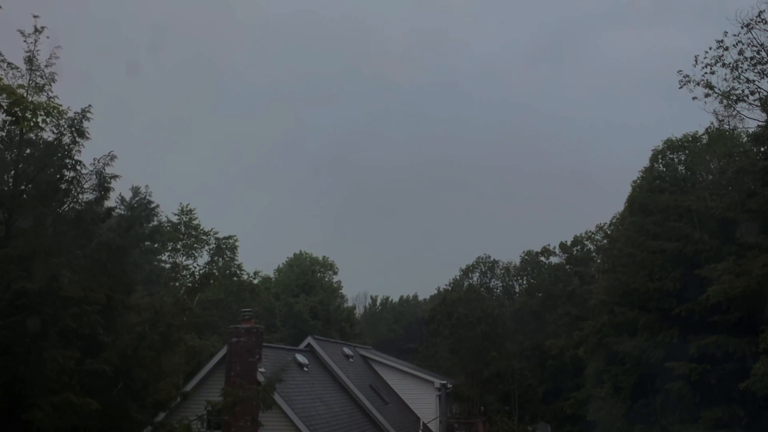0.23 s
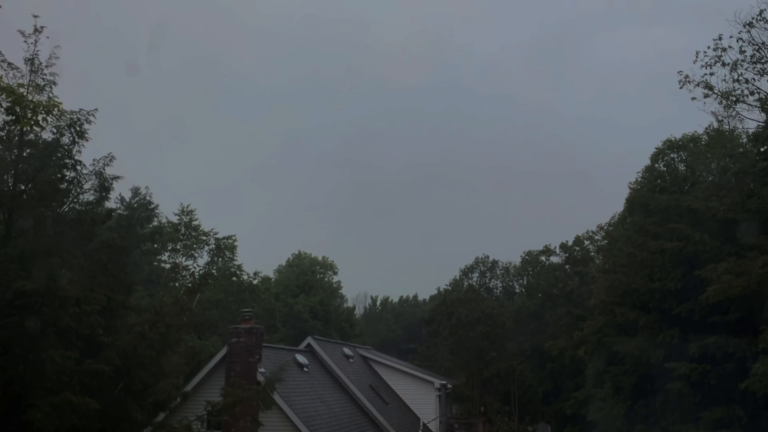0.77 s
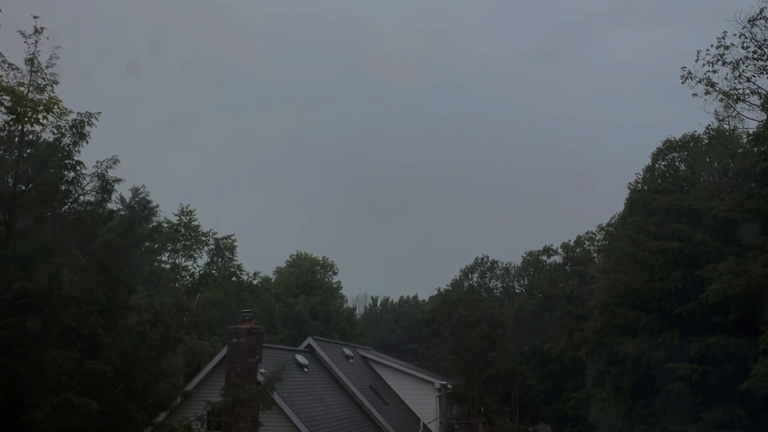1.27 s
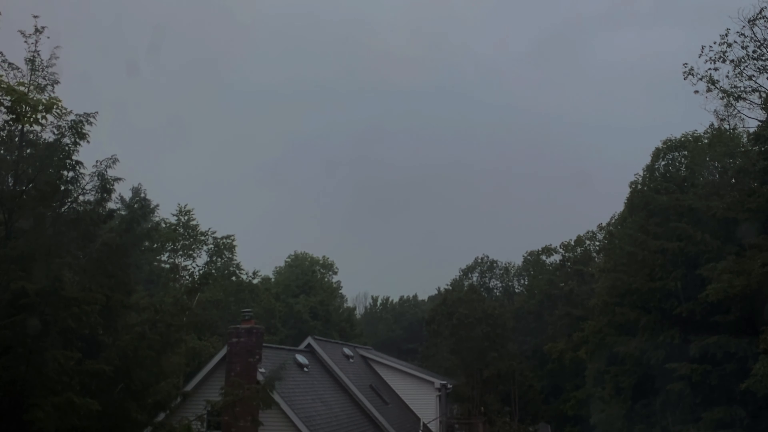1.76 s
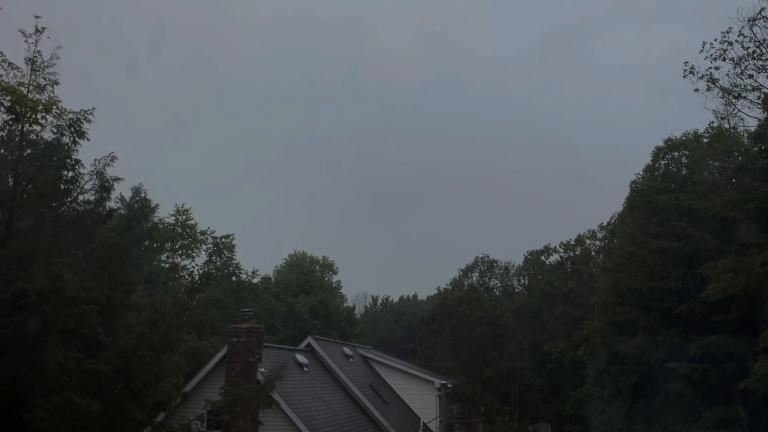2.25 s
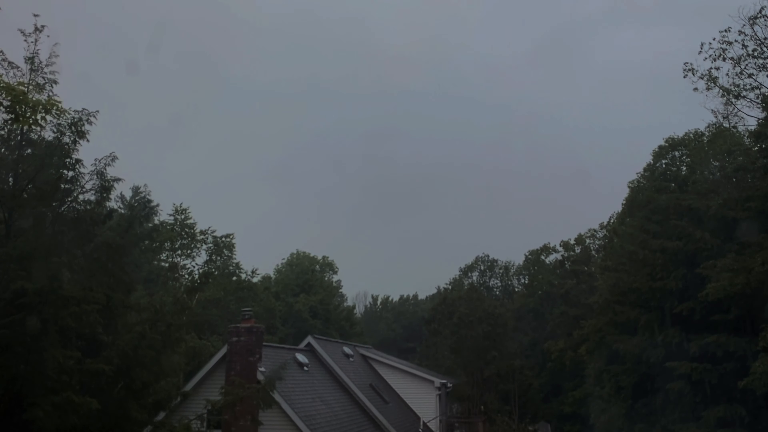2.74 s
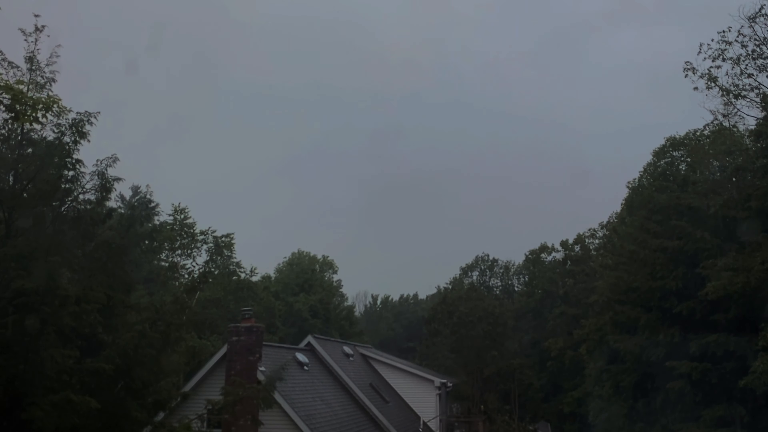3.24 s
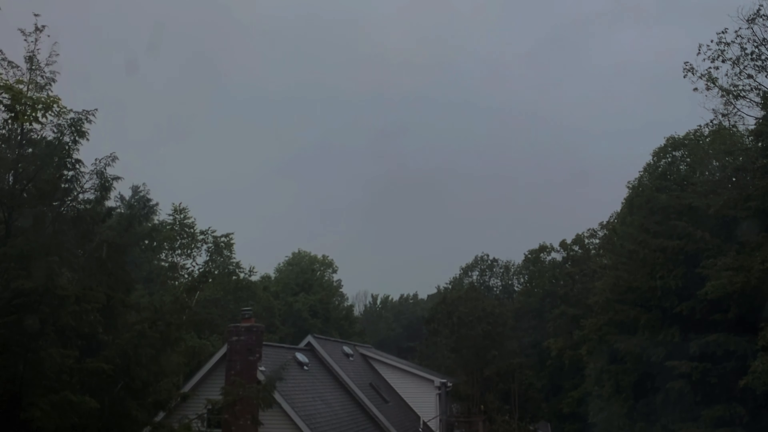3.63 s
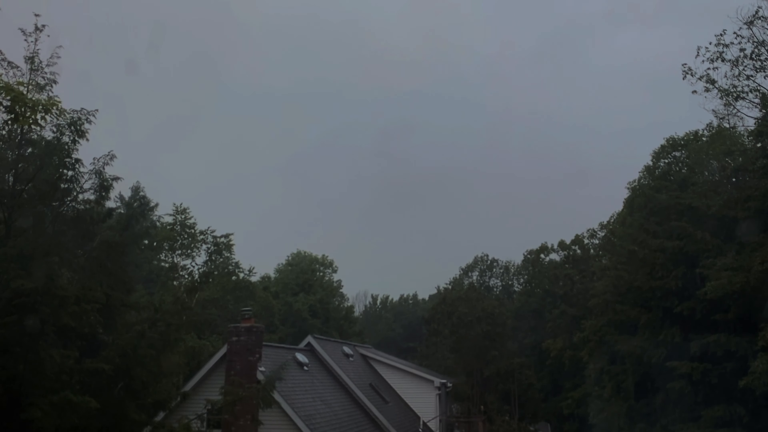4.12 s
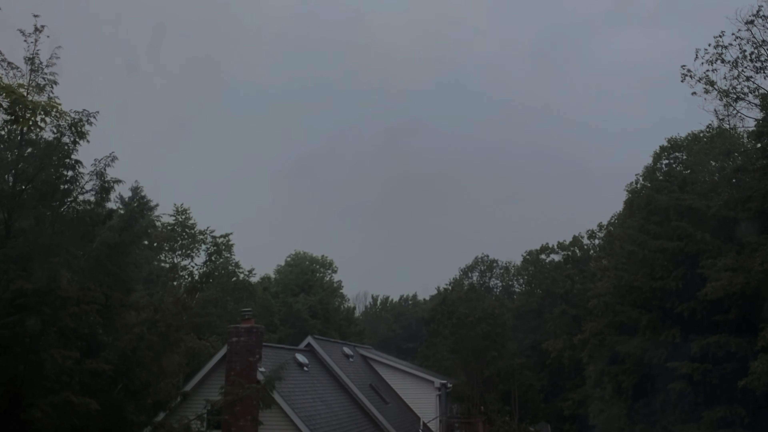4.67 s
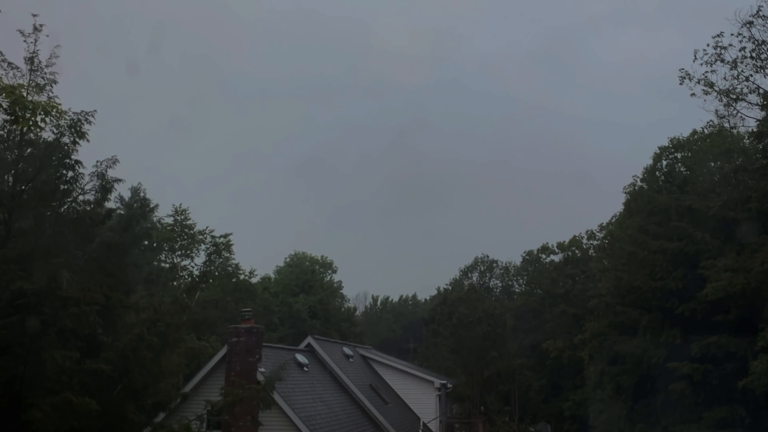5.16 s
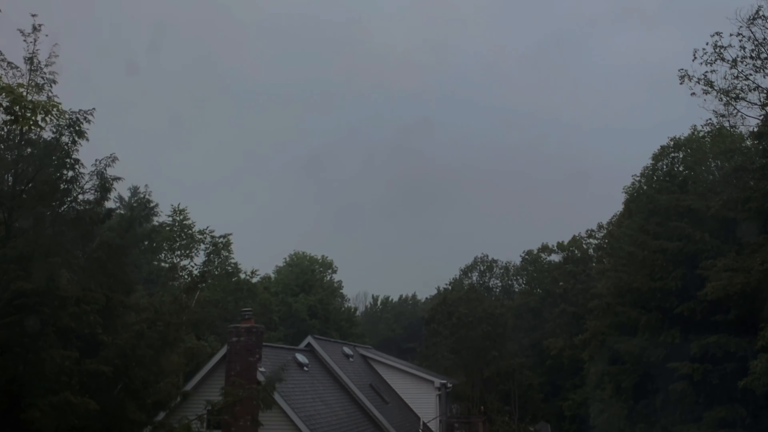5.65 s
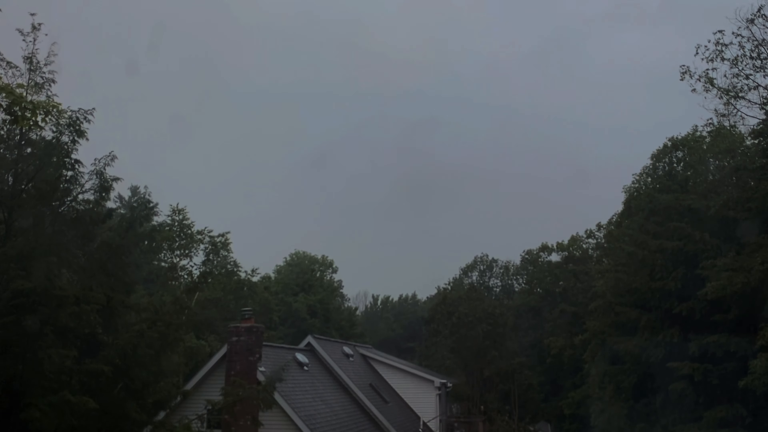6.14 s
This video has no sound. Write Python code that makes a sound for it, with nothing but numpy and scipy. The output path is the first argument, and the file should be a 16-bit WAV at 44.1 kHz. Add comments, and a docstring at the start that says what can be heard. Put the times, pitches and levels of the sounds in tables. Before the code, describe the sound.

Stereo, from a room with an open window, trees and light rain hissing softly outside throughout. The first half second is nearly quiet: low rumble, faint crackle and a small near click at about 0.2. Around 0.5 thunder breaks close by with deep thuds, quickly growing into a violent tearing crackle, loudest from 0.75 to 0.95, with hard cracks and chest-heavy thumps. It drops away by 1.2, leaving rumble with separate claps near 1.3 and 1.5, a stronger knock at 1.9 to 2.0, and weaker ones at 2.2, 2.3 and 2.7. At 3.4 a second peal swells, more boom and growl than crackle, bumping heavily until about 4.2, then rolling off unevenly. A shorter boom comes at 5.2, a distinct close click at 5.5, then dull distant grumbling until the end at 6.4. Room resonances make the thunder slightly hollow, with briefly pitched growls; a few tiny ticks are nearby.

```python
"""Close thunder heard through an open window

A cracking first peal, single claps, then a second peal that rolls away over a distant rumble.
Shocks from the crooked lightning channel arrive in swarms, made as random impulses filtered into boom,
thud, growl and crackle; claps, cracks, thumps and briefly pitched surges stand out, and room modes colour all.
Trees and light rain hiss outside as filtered noise; a few near ticks and clicks are short noise bursts.
"""
import sys
import numpy as np
from scipy import signal
from scipy.fft import rfft, irfft, next_fast_len
from scipy.io import wavfile
from scipy.ndimage import uniform_filter1d, minimum_filter1d, map_coordinates

SR = 44100
rng = np.random.default_rng(int(sys.argv[2]) if len(sys.argv) > 2 else 0)


def to_wav(s):
    """Save 16-bit WAV."""
    ch = np.atleast_2d(s).T  # columns
    pcm = np.round(np.clip(ch, -1, 1) * 32767)  # PCM
    wavfile.write(sys.argv[1], SR, pcm.astype(np.int16))


N = 282057

# claps, where a stretch of the channel arrives all at once and a short swarm follows in its wake:
# start_s, length_s, strength_db, crackle_db (against strength), depth_db (wake: more boom, less growl)
CLAPS = [(0.261, 0.043, -55, -1, 7), (0.511, 0.031, -31.5, -28, 3.5), (0.681, 0.028, -23.5, -23.5, -1.5),
         (0.743, 0.042, -21, -26, -2.5), (0.851, 0.054, -24, -17.5, -7.5), (1.155, 0.036, -35, -13, 2.5),
         (1.302, 0.034, -28.5, -19, -1.5), (1.47, 0.033, -31, -17.5, 2), (1.906, 0.026, -26.5, -17.5, 3),
         (2.2, 0.032, -34, -19, 1), (2.683, 0.053, -32.5, -15, 2.5), (2.986, 0.027, -43.5, -17, -5.5),
         (3.403, 0.044, -30, -26, 5), (3.554, 0.04, -34, -18.5, -4.5)]
# spectral shape of claps and thumps: frequency_hz, density_db (per Hz)
CLAP_SPECTRUM = [(20, -41), (45, -11), (80, -9), (170, 6.5), (310, 1), (420, -5), (520, -22.5), (1000, -46),
                 (4000, -100)]
# spectral shape of the shortest shocks: frequency_hz, density_db (per Hz)
CRACKLE_SPECTRUM = [(250, -47), (430, -6), (560, 5.5), (700, 3.5), (810, 1), (1020, -0.5), (1300, -0.5),
                    (1550, -8), (2100, -18), (2600, -20.5), (4000, -31), (6500, -58.5), (12000, -76.5)]


def amp(db):
    """Decibels to an amplitude ratio."""
    return 10 ** (np.asarray(db) / 20)


def unit(x):
    """Scale to a root-mean-square of 1."""
    return x / np.sqrt(np.mean(x ** 2) + 1e-20)


def along(points, hz):
    """Interpolate (frequency, value) points on a logarithmic frequency axis."""
    f, v = np.transpose(points)
    return np.interp(np.log(hz + 1), np.log(f + 1), v)


def curves(rows):
    """Interpolate each column after the time to one value per sample."""
    s, *cols = np.transpose(rows)
    return [np.interp(np.arange(N) / SR, s, c) for c in cols]


def wobble(rate):
    """Slow fluctuation: a smooth curve through random knots, rate of them a second."""
    knots = rng.standard_normal(int(N * rate / SR) + 4)
    return map_coordinates(knots, [np.arange(N) * rate / SR])


def filtered(x, response):
    """Linear filtering: multiply the spectrum by a response of frequency."""
    m = next_fast_len(N + SR // 2)
    return irfft(rfft(x, m) * response(np.fft.rfftfreq(m, 1 / SR)), m)[..., :N]


def causal(x, shape, size=32768):
    """Minimum-phase filtering: a dB shape of frequency fixes a causal response, scaled to energy 1."""
    cepstrum = irfft(np.log(amp(shape(np.fft.rfftfreq(size, 1 / SR)))))
    # folding the cepstrum onto positive times makes the phase minimal
    response = irfft(np.exp(rfft(2 * cepstrum[:size // 2], size)))
    response = response / np.linalg.norm(response)
    return signal.fftconvolve(x, response[None], axes=1)[:, :N]


def ring(x, spectrum):
    """Impulse response: each shock in x becomes a pulse with the given spectral shape."""
    return causal(x, lambda hz: along(spectrum, hz))


def shocks(rate, scatter_db):
    """Poisson-like arrivals: mid and side trains of random-sign impulses, rate a second, uneven in size."""
    arrive = rng.random((2, N)) < rate / SR
    sign = np.sign(rng.standard_normal((2, N)))
    size = amp(scatter_db * rng.standard_normal((2, N)))
    return unit(arrive * sign * size)


def even(x, seconds):
    """Envelope normalization: take out swells slower than the given time and keep the fast grain."""
    window = max(int(seconds * SR), 2)
    power = uniform_filter1d(uniform_filter1d(x ** 2, window), window)
    return x / np.sqrt(np.abs(power) + 1e-9)


def swell(start, hold, fade):
    """Energy envelope in dB of one swarm: arrivals build up, hold, decay exponentially and run out."""
    rise_s, rise_share = 0.011, 0.26  # rise time: this minimum plus a share of the hold
    range_db = 18.5  # a swarm that has faded by this much has run out of channel
    end_db_per_s = 151  # extra fade from then on
    age = np.arange(N) / SR - start
    rise = np.clip(age / (rise_s + rise_share * hold), 1e-6, 1)
    fading = np.maximum(age - rise_s - hold, 0)
    spent = np.maximum(fading - range_db / fade, 0)
    silence_db = 100 * (age < 0)
    return 10 * np.log10(rise) - silence_db - fade * fading - end_db_per_s * spent


def swarms():
    """Incoherent addition: powers of rumble, peals and clap wakes sum to boom, thud, growl, crackle dB."""
    # peals, each a branch of the channel heard from its near end to its far end:
    # start_s, hold_s, fade_db_per_s, strength_db, then against strength: boom_db, growl_db, crackle_db
    peals = [(0, 0.0034, 245, -44, -3, -2, 2.5), (0.24, 0.027, 221, -51.5, 7, 13, 5),
             (0.346, 0.26, 92, -49, 6.5, -2, -1.5), (0.458, 0.026, 101, -57.5, -9.5, -5, 11.5),
             (0.53, 0.082, 98, -21.5, -1.5, -2.5, -21), (.64, 0.08, 102, -28.5, -3.5, -5.5, -12.5),
             (0.745, 0.17, 150, -18, -3.5, -2, -16.5), (0.811, 0.087, 128.5, -32, 0, -3.5, -9),
             (0.968, 0.036, 169.5, -25, -1, 3.5, -13.5), (1.08, 0.12, 111, -41.5, 2, 2, -9.5),
             (1.55, .06, 88, -42.5, 1, -2, -6.5), (1.667, 0.09, 104, -41, 3.5, 5.5, -11.5),
             (1.869, .06, 75.5, -48.5, -4.5, -4, 2), (1.915, 0.026, 200, -29, -1, -0.5, -15.5),
             (2.005, 0.039, 87.5, -45.5, -2.5, -0.5, -5), (2.284, 0.066, 174, -32, -3.5, -1, -22),
             (2.418, 0.013, 252, -40.5, 8.5, 3, -21), (2.717, 0.016, 264.5, -34, 0, -5.5, -23),
             (2.778, 0.024, 98, -52.5, -9, 4.5, -16), (2.973, 0.041, 90.5, -41.5, 1.5, 11.5, -19.5),
             (3.075, 0.039, 129, -37.5, 2.5, -1, -15), (3.416, 0.11, 57.5, -22, -6, -5, -24),
             (3.534, 0.2, 16.5, -24, -1.5, -1.5, -19), (3.747, 0.38, 29, -32.5, -7, 1.5, -11),
             (4.117, 0.15, 148, -36, -5.5, -0.5, -9), (4.4, 0.18, 78.5, -32, -10.5, -2.5, -15.5),
             (4.869, 0.078, 185, -44.5, -3, 7, -2), (5.018, 0.046, 120, -48, 3, -5.5, -1.5),
             (5.049, 0.2, 100.5, -33, 4, -2.5, -10.5), (5.102, .06, 90.5, -31.5, -0.5, -6, -18.5),
             (5.221, 0.074, 175, -27.5, 2, -4.5, -19), (5.456, 0.036, 118, -40.5, 5.5, 5.5, -5),
             (5.567, 0.041, 66, -42, 5.5, 2.5, -4.5), (5.641, 0.034, 94, -36, -7.5, -2, -13),
             (5.719, 0.043, 95, -48.5, -3, 0, -10), (6.049, .05, 116, -52.5, 8.5, -4, -7),
             (6.217, .05, 82, -42, -2.5, 0, -9), (6.314, .08, 60, -37.5, -16, 1, -15.5)]
    # the distant rumble under it all: time_s, level_db
    rumble = [(0, -48), (.15, -50), (.5, -56), (1.1, -42), (1.43, -43.5), (1.6, -43), (1.86, -43),
              (2.3, -44.5), (2.62, -45.5), (2.85, -44.5), (3.15, -42.5), (3.32, -45), (4.6, -41),
              (4.84, -44), (5.02, -46), (5.75, -44), (6.02, -46), (6.4, -47)]
    # the rumble's make-up: boom_db, thud_db, growl_db, crackle_db
    rumble_mix = (1, 3, 1, -8)
    wake_db, wake_s, wake_db_per_s = -4.5, 0.028, 133.5  # level against the clap, hold, fade
    shapes, mixes = [curves(rumble)[0]], [rumble_mix]
    for s, hold, fade, db, boom_db, growl_db, crackle_db in peals:
        shapes.append(swell(s, hold, fade))
        mixes.append(db + np.array([boom_db, 0, growl_db, crackle_db]))
    for s, _, db, crackle_db, depth_db in CLAPS:
        shapes.append(swell(s, wake_s, wake_db_per_s))
        mixes.append(db + wake_db + np.array([depth_db, 0, -depth_db, crackle_db]))
    power = amp(mixes).T ** 2 @ amp(shapes) ** 2
    return 10 * np.log10(power)


def roll(boom_db, thud_db, growl_db):
    """Superposed shock arrivals: swarms of long, medium and shorter pulses make boom, thud and growl."""
    # spectral shapes, longest shocks first: frequency_hz, density_db (per Hz)
    boom_spectrum = [(15, -45), (28, -24), (42, -5.5), (58, -5.5), (72, -2.5), (125, 3.5), (155, -9.5),
                     (230, -62), (500, -100)]
    thud_spectrum = [(60, -45), (110, -15.5), (140, -1), (175, -1.5), (230, -1.5), (265, -8), (340, -24.5),
                     (700, -80)]
    growl_spectrum = [(130, -43.5), (230, -16), (275, -3), (315, 0), (360, -6), (440, -11), (510, -23),
                      (700, -23.5), (1500, -73.5), (4000, -110)]
    boom = even(ring(shocks(rate=370, scatter_db=2.5), boom_spectrum), seconds=0.065)
    thud = even(ring(shocks(rate=300, scatter_db=4.0), thud_spectrum), seconds=0.042)
    growl = even(ring(shocks(rate=300, scatter_db=4.5), growl_spectrum), seconds=0.031)
    return amp(boom_db - 0.5) * boom + amp(thud_db - 5.0) * thud + amp(growl_db - 6.0) * growl


def crackle(level_db):
    """Air absorption over dense arrivals: the shortest shocks, from small kinks, merge into tearing."""
    # what a long path does to the crackle: frequency_hz, gain_db
    far_air = [(400, 7), (750, 4), (1100, -2), (2000, -11), (4000, -28)]
    near = ring(shocks(rate=1200, scatter_db=1.5), CRACKLE_SPECTRUM)
    far = filtered(near, lambda hz: amp(along(far_air, hz)))
    # the last shocks have come farthest, and the air has taken their treble
    dullness = np.interp(np.arange(N) / SR, [4.3, 5.3], [0, .65])
    grain = even((1 - dullness) * near + dullness * far, seconds=0.077)
    clumps_db = 1.3 * wobble(60)
    return amp(level_db - 3.5 + clumps_db) * grain


def claps():
    """Near-simultaneous arrival: each clap is a tight volley of shocks with a sudden front."""
    low, high = np.zeros((2, 2, N))
    swarm = shocks(rate=900, scatter_db=2)
    for s, length, db, crackle_db, _ in CLAPS:
        start, count = round(s * SR), round(length * SR)
        volley = unit(swarm[:, start:start + count] * np.linspace(1, .5, count))
        low[:, start:start + count] += amp(db) * volley
        high[:, start:start + count] += amp(db + crackle_db) * volley
    return ring(low, CLAP_SPECTRUM) + ring(high, CRACKLE_SPECTRUM)


def lone_shocks(events, spectrum):
    """Early reflection: each steep shock is followed by quick repeats off the ground and house walls."""
    echo_db, echo_s = -9.5, 0.0056  # typical level of a repeat, latest delay
    pair = np.zeros((2, N))
    for s, db in events:
        start = round(s * SR)
        pair[0, start] += amp(db)
        for channel in pair:
            delays = (rng.uniform(.1, 1, size=4) * echo_s * SR).astype(int)
            channel[start + delays] += amp(db + echo_db) * rng.standard_normal(size=4)
    return ring(pair, spectrum)


def surges():
    """Periodicity pitch: runs of almost evenly spaced shocks, drawn as unsteady sines in the mid alone."""
    # surges: start_s, length_s, mean_rate_hz (shocks per second), strength_db
    runs = [(0.681, 0.034, 320, -27), (0.693, 0.068, 85, -23), (0.824, 0.072, 80, -25.5),
            (0.852, 0.1, 415, -30.5), (0.88, 0.066, 220, -25), (0.956, 0.066, 422.9, -35.5),
            (1.309, 0.079, 313.4, -36.5), (1.476, 0.031, 316, -34), (1.482, 0.037, 205, -34.5),
            (2.177, 0.067, 319, -37.5), (3.09, 0.22, 227, -46.5), (3.479, 0.069, 81.5, -22),
            (3.555, 0.11, 181.3, -24.5), (3.649, .045, 318, -27.5), (3.829, 0.051, 318, -25.5),
            (4.521, .14, 232, -43.5), (5.234, 0.092, 101.1, -31.5), (5.281, 0.055, 210.6, -32),
            (5.463, .05, 315, -42), (6.321, .07, 230.5, -44.5)]
    jitter, rough_db = 0.027, -1.5  # unevenness of the spacing (share) and of the size
    t = np.arange(N) / SR
    pace = np.cumsum(1 + jitter * wobble(90)) / SR  # unevenly running time in s
    size = amp(rough_db * wobble(70))
    pair = np.zeros((2, N))
    for s, length, hz, db in runs:
        arch = np.sqrt(np.abs(np.sin(np.pi * np.clip((t - s) / length, 0, 1))))
        tone = np.sqrt(2) * np.sin(2 * np.pi * (hz * pace + rng.random()))
        pair[0] += amp(db) * arch * size * tone
    return pair


def room(x):
    """Modal resonance: standing waves colour the thunder and ring on, driven differently by direction."""
    # the room's modes, the narrow ones ringing longest:
    # centre_hz, width_hz, first_lift_db, second_lift_db (from the first and the second direction)
    modes = [(73, 27, 2.5, 7), (169.5, 15, 4, 10.5), (213.4, 14, 7.5, 8.5), (231.15, 10, 13, 7),
             (243, 18, -1, -3.5), (274.4, 20, 6.5, 2.5), (321.6, 25, 12.5, 10.5), (354, 8.8, 0, -4.5),
             (399.6, 18, 11, 10), (422.7, 18.7, 15.5, 7), (470.6, 14, 8.5, 10), (580, 23, -1.5, 2.5),
             (638.3, 21, 9, 8), (683, 3.2, 2.5, 8.5), (911.5, 18, 10.5, 8), (1017, 67, 6.5, 7.5),
             (1273, 80, 2, 1), (1600, 78, 6.5, 5.5), (1910, 330, 5, 4), (2245, 96, 11, -1)]
    # where in the sky the sound comes from: time_s, bearing (0 first direction - 1 second)
    bearing = [(3.2, 0.023), (3.4, 1), (5.3, 0.41), (6.2, 0)]
    centre, width, first_db, second_db = np.transpose(modes)

    def peaks(hz):
        return 1 / (1 + (2 * (hz[:, None] - centre) / width) ** 2)

    # the bearing strays along the crooked channel, so the resonances trade strength
    turn = np.clip(curves(bearing)[0] + .25 * wobble(9), 0, 1)
    first = causal((1 - turn) * x, lambda hz: peaks(hz) @ first_db)
    second = causal(turn * x, lambda hz: peaks(hz) @ second_db)
    return first + second


def taps(events, spectrum, t60, room_db, room_t60):
    """Exponential decay: small near contacts give a short noise snap and a faint tail in the room."""
    t = np.arange(N) / SR
    level = np.zeros(N)
    for s, db in events:
        age = np.maximum(t - s, 0)
        onset = (t >= s) * (1 - np.exp(-age / 0.0014))
        snap = amp(-60 * age / t60)
        tail = amp(room_db - 60 * age / room_t60)
        level += amp(db) * onset * (snap + tail)
    return level * ring(rng.standard_normal((2, N)), spectrum)


def hiss():
    """Broadband noise of many small sources: leaves and fine rain make a wash with tiny drops in it."""
    # spectral shape of the hiss outside: frequency_hz, density_db (per Hz)
    hiss_spectrum = [(100, -15.5), (1000, 8.5), (2000, 2), (2600, 0), (3900, 2), (4900, -2), (5800, -11.5),
                     (7500, -19.5), (9000, -29.5), (11500, -20.5), (13000, -33.5), (16000, -39.5)]
    # the wash outside eases a little: time_s, level_db
    rain = [(0, -60.5), (1, -61.5), (3.5, -62.5), (6.4, -63)]
    wash = amp(.4 * wobble(2.9)) * ring(rng.standard_normal((2, N)), hiss_spectrum)
    drops = amp(-6.5) * ring(shocks(rate=260, scatter_db=2.5), hiss_spectrum)
    return amp(curves(rain)[0]) * (wash + drops)


def spread(pair):
    """Interchannel level and phase difference: mid and side to left and right, the bass nearly mono."""
    # how far the two microphones differ: frequency_hz, side_against_mid_db
    side_width = [(60, -23), (100, -18), (180, -18), (260, -8), (325, -16.5), (370, -13), (430, -9.5),
                  (600, -3.5), (1100, -6), (1900, 0), (4000, -4.5)]
    # level difference: frequency_hz, left_minus_right_db
    lean = [(400, 0.3), (650, -3.5), (1200, -3.5), (1900, -0.5), (3000, 1)]
    # the window is to the right, so left lags: frequency_hz, lag_rad
    lag = [(430, 0.13), (950, 0.45), (1550, 1.7), (2100, 1.9), (2650, 5), (3300, 5.5), (4000, 6.5),
           (6000, 7.5)]
    mid = pair[0]
    side = filtered(pair[1], lambda hz: amp(along(side_width, hz)))
    half = np.array([[.5], [-.5]])  # each ear takes half of the difference

    def offset(hz):
        return amp(half * along(lean, hz)) * np.exp(-1j * half * along(lag, hz))

    return filtered(np.array([mid + side, mid - side]), offset)


def scene():
    """Superposition: thunder and hiss come in through the window; ticks and clicks are close by."""
    # cracks, single sharp shocks that stand out of the tearing: time_s, strength_db
    crack_events = [(.701, -22.5), (.763, -15), (0.803, -17.5), (.84, -10.5), (.859, -9), (.881, -9),
                    (.924, -19.5), (.984, -22), (1.022, -22.5), (1.141, -18), (1.299, -23), (1.31, -21.5),
                    (1.493, -25.5), (1.904, -29), (1.922, -22.5), (1.95, -21.5), (1.972, -22), (2.213, -24),
                    (2.301, -26.5), (2.683, -26.5), (3.009, -26.5), (3.187, -27), (3.568, -21),
                    (3.756, -21.5), (3.788, -24.5), (3.83, -21), (3.942, -25.5), (3.993, -23.5),
                    (4.129, -21), (4.21, -18.5), (4.279, -24), (4.494, -25), (4.6, -22), (5.097, -26),
                    (5.886, -43)]
    # thumps, single long shocks that punch through the roll: time_s, strength_db
    thump_events = [(.554, -7), (.61, -3), (.748, -1), (.852, 1), (1.021, -5), (1.948, -6), (3.59, -2.5),
                    (3.67, -3.5), (3.901, -4), (3.95, -6.5), (3.994, -5), (5.24, -8), (5.287, -9)]
    # faint ticks, then clicks, one much louder: time_s, level_db
    tick_events = [(1.24, -57.5), (3.096, -55), (3.722, -54.5), (4.112, -53.5)]
    click_events = [(.176, -40.5), (5.447, -46.5), (5.5125, -29.5)]
    # spectral shapes of a crack, a tick and a click: frequency_hz, density_db (per Hz)
    crack_spectrum = [(250, -44), (500, -6.5), (750, 6), (1300, 1), (1800, -16), (2500, -18), (3500, -26.5),
                      (5000, -41.5), (7000, -62), (12000, -88)]
    tick_spectrum = [(2000, -17), (5000, -4.5), (7700, -2.5), (8400, -1), (9100, -16.5), (11000, -4.5),
                     (12500, -1), (13500, -23.5), (15500, -9.5)]
    click_spectrum = [(150, -19), (400, 4), (1200, 4.5), (2200, -2), (3500, -9.5), (6500, -17.5),
                      (9000, -34), (10800, -25), (13000, -37), (15000, -36)]
    # chance swells of about 1 dB, 13 knots a second, within each part of the thunder
    *low_db, crackle_db = [db + 1 * wobble(13) for db in swarms()]
    thunder = roll(*low_db) + crackle(crackle_db) + claps() + surges()
    cracks = lone_shocks(crack_events, crack_spectrum)
    thumps = lone_shocks(thump_events, CLAP_SPECTRUM)
    outside = room(thunder + cracks + thumps) + hiss()
    ticks = taps(tick_events, tick_spectrum, t60=0.018, room_db=-10, room_t60=0.17)
    clicks = taps(click_events, click_spectrum, t60=.033, room_db=-26, room_t60=.2)
    return spread(outside) + ticks + clicks


def record(dry):
    """Peak limiting and band limiting: a limiter turns both channels down together at the biggest peaks."""
    needed = np.minimum(1, amp(-5) / (np.abs(dry).max(axis=0) + 1e-9))
    # the gain drops ahead of a peak and recovers after it, over 900 samples
    gain = uniform_filter1d(minimum_filter1d(needed, size=900), size=900)
    return filtered(dry * gain, lambda hz: hz < 15700)


dry = scene()
out = record(dry)
to_wav(out)
```